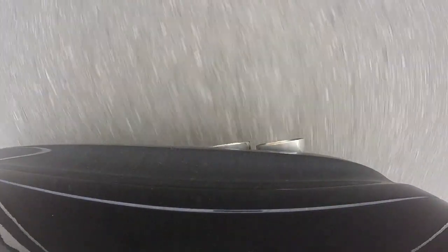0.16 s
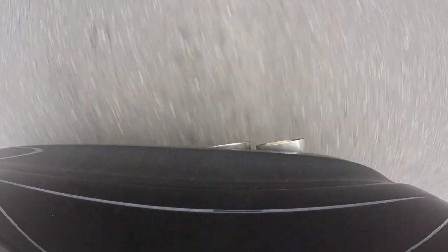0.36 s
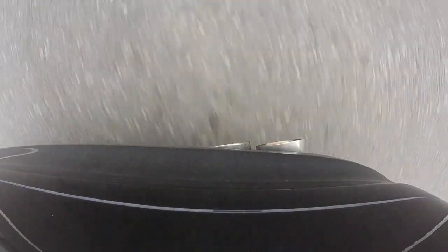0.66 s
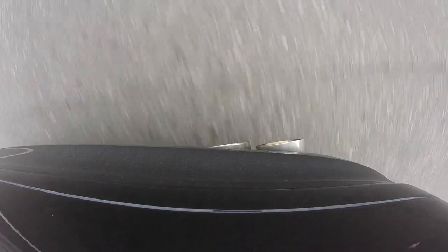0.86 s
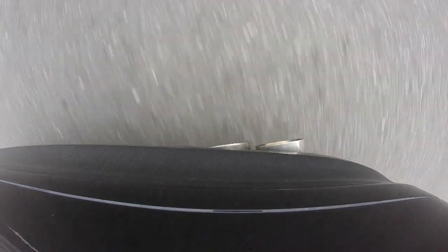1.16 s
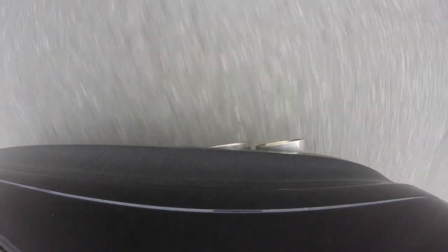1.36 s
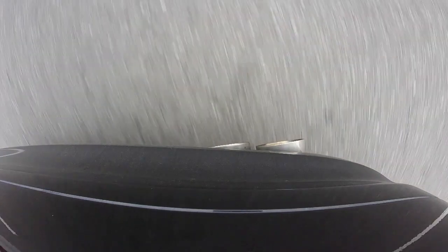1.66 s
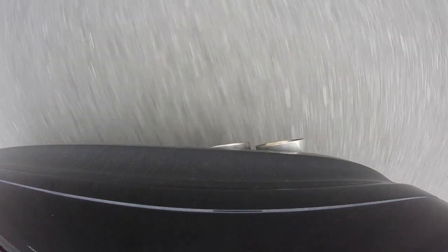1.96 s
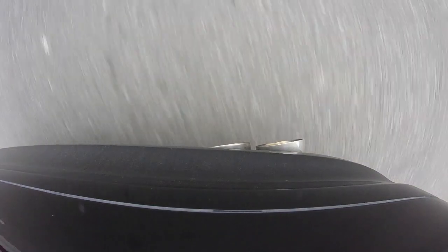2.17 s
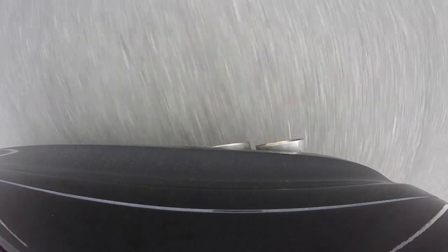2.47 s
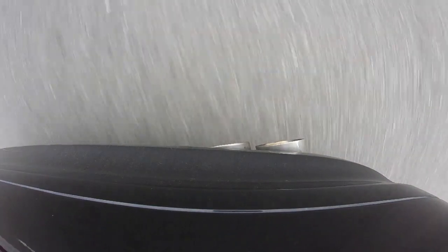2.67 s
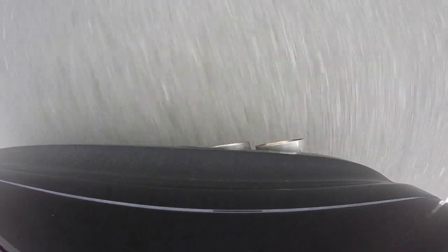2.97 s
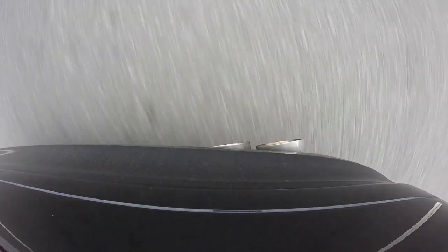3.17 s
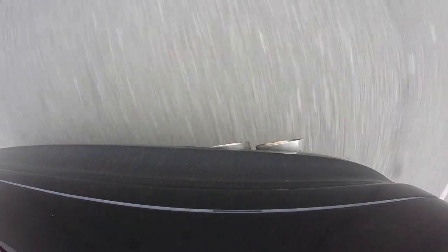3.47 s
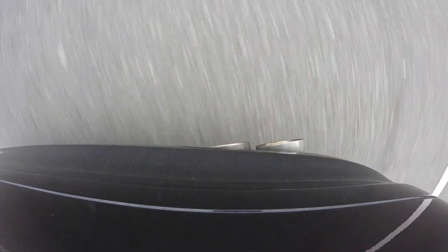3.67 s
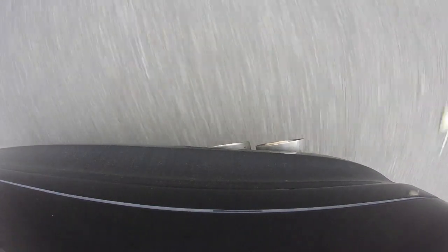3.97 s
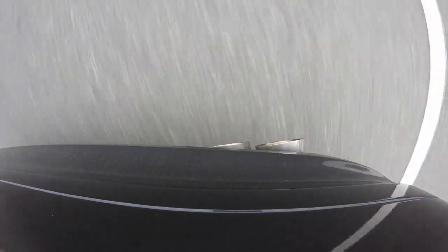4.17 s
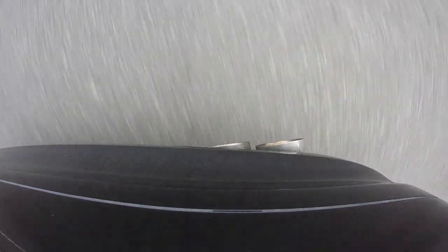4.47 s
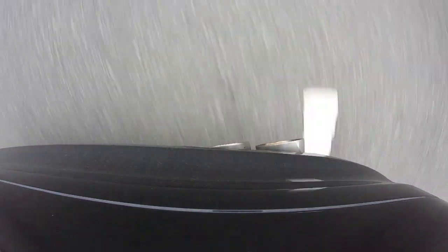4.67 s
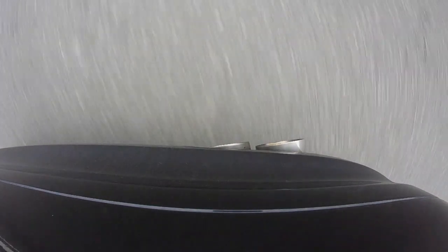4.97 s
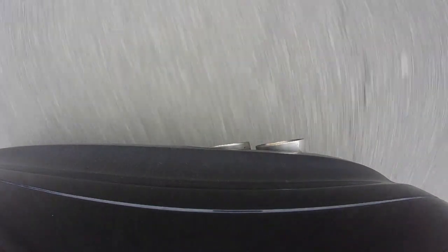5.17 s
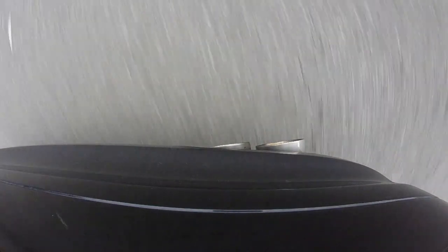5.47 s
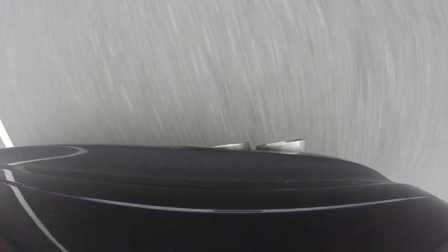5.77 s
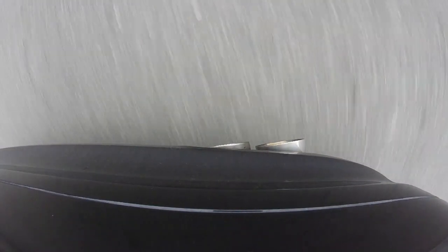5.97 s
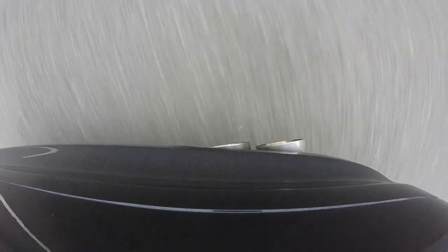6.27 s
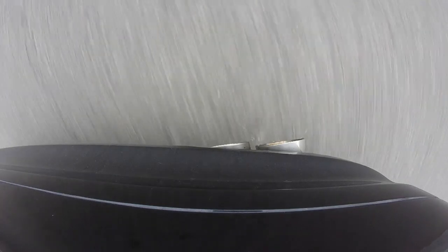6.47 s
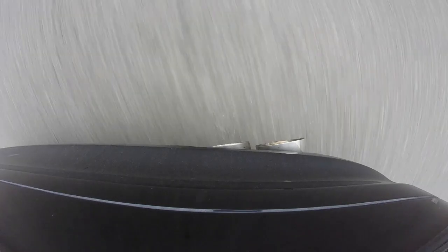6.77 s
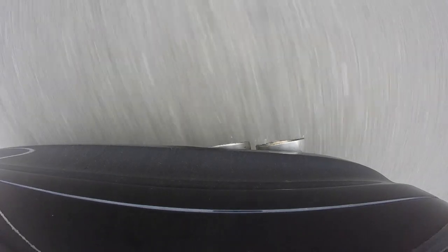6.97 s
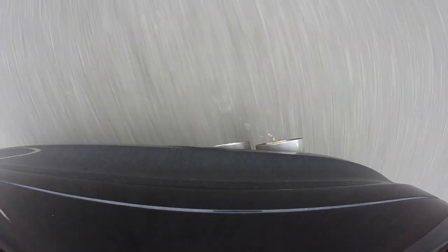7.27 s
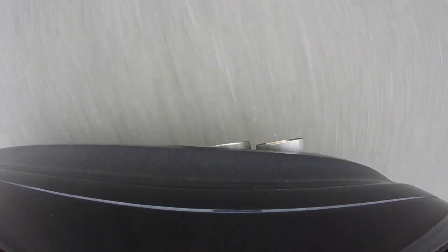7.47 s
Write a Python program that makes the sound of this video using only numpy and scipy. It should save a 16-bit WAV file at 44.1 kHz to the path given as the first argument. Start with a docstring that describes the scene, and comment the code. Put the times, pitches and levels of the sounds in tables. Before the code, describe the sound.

A six-cylinder car engine starts low and quiet, then pulls hard through one gear, its exhaust growl climbing in pitch and turning louder and raspier. Near the end a loose plastic clip rattles, the throttle lifts and the revs fall. Tyres drone on the road while wind and a shaking mount add a deep rumble. The sound is close and boxy, from a microphone in a closed case above the tailpipes.

```python
"""A six-cylinder car engine pulls hard through one gear, then eases off.
Two banks of three cylinders fire into ringing pipes, and gas rasps with each firing.
We listen from a camera in a closed case above the tailpipes. The tyres drone, wind and road
shake the springy mount about 35 times a second, and near the end a loose plastic clip rattles."""
import sys
import numpy as np
from scipy import signal
from scipy.fft import rfft, irfft
from scipy.io import wavfile
from scipy.ndimage import uniform_filter1d

SR = 44100
rng = np.random.default_rng(int(sys.argv[2]) if len(sys.argv) > 2 else 0)


def dump_mix(stems):
    """Bounce the given channels to the path in sys.argv[1] as a 16-bit WAV at rate SR."""
    frames = np.atleast_2d(stems).T  # one column per channel
    limited = np.clip(frames, -1, 1)  # hard clip at full scale
    pcm = np.round(limited * 32767).astype(np.int16)
    wavfile.write(sys.argv[1], SR, pcm)


N = 336042
TIME = np.arange(N) / SR
FREQ = np.arange(N // 2 + 1) * SR / N + 1e-3


def gain(db):
    """Turn decibels into a multiplier."""
    return 10 ** (np.asarray(db) / 20)


def unit(x):
    """Scale a signal to an average strength (rms) of 1."""
    return x / np.sqrt(np.mean(x ** 2))


def curves(table):
    """Join a table's points into one curve over time per column."""
    times, *columns = np.transpose(table)
    return [np.interp(TIME, times, column) for column in columns]


def resonances(hz, modes, steep=1):
    """How a ringing object answers each frequency; modes are (f/Hz, width/Hz, level/dB)."""
    return sum((-1) ** k * gain(db) * (1j * hz * width / (f * f - hz * hz + 1j * hz * width)) ** steep
               for k, (f, width, db) in enumerate(modes))


def colour(x, response):
    """Filter a signal, then scale it to strength 1."""
    return unit(irfft(rfft(x) * response, N))


def wander(rate):
    """A smooth random wobble that takes `rate` steps a second."""
    hold = int(SR / rate)
    steps = np.repeat(rng.standard_normal(N // hold + 1), hold)[:N]
    return unit(uniform_filter1d(uniform_filter1d(steps, hold), hold))


# The engine's tones; halves come from unequal banks: multiple of the firing rate, relative level/dB
TONES = [(.5, -3.5), (1, 3), (1.5, -0.5), (2, -2), (2.5, -7), (3, -12.5), (3.5, -12.5), (4, -13),
         (4.5, -20.5), (5, -26), (5.5, -25)]
# How the pipes boost a tone: f/Hz, level/dB with the banks in step, level/dB with them opposed
PIPE_BOOST = [(66.2, 5.5, -12), (85.46, 14.5, 4.5), (104.7, -13.5, -7.5), (129.8, 6.5, -2),
              (152.4, 3, -10.5), (178.5, 5.5, 2), (204.5, 3.5, 4), (220.3, 13.5, 11), (237.34, 9.5, 0.5),
              (254.6, 4.5, -10.5), (272.14, 13.5, -4.5), (287.1, -18, -4.5), (308.5, 0.5, -11),
              (340.7, -1, -0.5), (355.16, 14, 12), (375.8, 8, 1), (387.4, -12, -21.5), (425.6, -7.5, -20),
              (449.8, 0.5, -0.5), (491, -6.5, -4.5), (556.5, -5, -1.5), (584.6, 6, 8), (640.6, -8, -1.5),
              (642, -11.5, 6.5), (695.6, -4, 6.0), (781, -4.5, 7), (796.6, 5.5, 2), (860, -11.5, -0.5),
              (955, -17.5, -1), (1101.6, 0, -14), (1146, 5, -22.5), (1250.0, -14, -12), (1370.0, -6.5, 11)]
def engine_note(hz, fired, tone_db, rasp_db):
    """Regular firings make tones that swell and fade as they slide through the pipes' resonances."""
    pipe_hz, in_step_db, opposed_db = np.transpose(sorted(PIPE_BOOST))
    brighten_db = .08 * np.clip(rasp_db + 29, 0, None)  # rasp above -29 dB lifts the higher tones
    note = np.zeros(N)
    for multiple, db in TONES:
        boost_db = np.interp(np.log(multiple * hz), np.log(pipe_hz),
                             opposed_db if multiple % 1 else in_step_db)
        level_db = tone_db + db + boost_db + (multiple - 1) * brighten_db + .74 * wander(30)
        note += np.sqrt(2) * gain(level_db) * np.sin(2 * np.pi * multiple * fired)
    return note


# Each cylinder's strength, in firing order with the banks taking turns: level/dB
CYLINDER_LEVELS = [0, -6.5, -1.2, -5.8, -.6, -7.5]
# Extra travel time down each cylinder's own pipe: t/ms
CYLINDER_DELAYS = [0, .17, .025, .15, -.02, .2]
def firings(hz, fired):
    """Each firing gives a sharp pulse and a fading puff of gas; returns (pulses, gas)."""
    count = np.arange(int(fired[-1]) - 1)
    time_jitter, level_jitter = rng.standard_normal((len(count), 2)).T
    at = np.interp(count + .008 * time_jitter, fired, np.arange(N))
    at = np.clip(at + np.array(CYLINDER_DELAYS)[count % 6] * SR / 1000, 0, N - 2)
    size = gain(np.array(CYLINDER_LEVELS)[count % 6] + level_jitter)
    pulses = np.zeros(N)
    np.add.at(pulses, at.astype(int), size * (1 - at % 1))  # shared between two samples
    np.add.at(pulses, at.astype(int) + 1, size * (at % 1))
    latest = np.clip(fired.astype(int), 0, len(count) - 1)
    puffs = .25 + size[latest] * np.exp(-(fired % 1) / .35)
    return unit(pulses / np.sqrt(hz)), unit(puffs * rng.standard_normal(N))


# Where the pipes ring: f/Hz, width/Hz, level/dB
PIPE_RINGS = [(213.4, 17, 12), (354.9, 14.85, 16), (604.56, 24.23, 9.5), (701, 27, 4.5), (799.8, 70, 4),
              (1036, 32, -10.5), (1249, 120, -2.5)]
def pipe_growl(hz, fired, blows, growl_db):
    """Firings ring the pipes; slightly unequal cylinders add weak tones at sixths of the firing rate."""
    upper_rings = resonances(FREQ, PIPE_RINGS[2:]) / (1 + (FREQ / 1409) ** 4)
    growl = colour(blows, upper_rings) * gain(growl_db - 6)
    for multiple in [n / 6 for n in range(4, 30) if n % 3]:
        boost = np.abs(resonances(multiple * hz[::64], PIPE_RINGS))
        boost *= gain(2.6 * wander(1500)[:N // 64 + 1])
        tone = np.sin(2 * np.pi * (multiple * fired + rng.random()))
        growl += gain(.6963 * growl_db - 28.5) * boost.repeat(64)[:N] * tone
    return growl


# What the closed case lets through: f/Hz, width/Hz, level/dB
CASE_BANDS = [(1017, 57, -17.5), (1301.4, 235, 3), (1551.7, 139.2, 4), (2052, 110, -14.5), (2610, 390, -9),
              (3166, 92, -12), (3460, 275, -5), (4165, 300, -13), (4588, 420, -26.5), (5238, 360, -32),
              (6357, 750, -36), (7300, 140, -51.5), (8200, 730, -41.5), (9700, 620, -55), (11870, 500, -51)]
def gas_rasp(hz, pulses, gas, sharpness, rasp_db, gas_db):
    """Pulses and rushing gas come through the case as a low rasp, a hiss and a high sizzle."""
    case = resonances(FREQ, CASE_BANDS, steep=2)
    treble = (FREQ / 1461) ** 8  # splits rasp from hiss at 1461 Hz
    blows = (sharpness * pulses + np.sqrt(1 - sharpness ** 2) * gas) * gain(rasp_db + 17.09)
    rasp = irfft(rfft(blows) * case / (1 + treble), N)
    hiss = colour(.93 * sharpness * pulses + gas, case * treble / (1 + treble)) * gain(gas_db + 2.24)
    # the sizzle opens up only when the engine works hard and fast
    sizzle_db = -58.5 + 1.37 * (gas_db + 40.5) + 20.5 * np.log2(hz / 200)
    sizzle = colour(gas, case / (1 + (5380 / FREQ) ** 8)) * gain(np.maximum(sizzle_db, -80.5))
    return rasp + hiss + sizzle


# How often the engine fires: t/s, f/Hz
FIRING_RATE = [(0.0, 91.2), (0.2, 81.8), (0.6, 84.3), (0.8, 89.1), (1.2, 95.7), (1.4, 100.5), (2.2, 121.5),
               (2.8, 136.0), (3.2, 144.8), (3.6, 151.9), (4.0, 158.2), (4.6, 165.9), (5.2, 180.8),
               (5.4, 188.3), (5.6, 197.0), (6.2, 219.7), (6.4, 229.3), (6.9, 250.2), (6.98, 251.5),
               (7.14, 247.1), (7.22, 243.1), (7.3, 232.2), (7.54, 205.1), (7.62, 196.0)]
# How hard it works, before each layer's own boost: t/s, tone level/dB, rasp level/dB, gas level/dB
EFFORT = [(0.0, -43, -61, -67.5), (0.25, -37.5, -60, -57.0), (0.5, -59, -55.5, -57.5),
          (0.62, -44.5, -65, -68), (0.95, -35.5, -49, -59.5), (1.25, -26, -42, -52.5),
          (1.75, -25, -40, -49.0), (2.2, -27, -38.5, -47.5), (2.65, -24, -34, -44.0),
          (2.95, -27, -36, -50.5), (3.3, -26.0, -36, -47.5), (3.9, -31.5, -37.5, -50.5),
          (4.75, -28, -34.5, -49.5), (4.95, -29, -28.5, -40.5), (5.48, -23, -28.0, -38.5),
          (5.56, -21.5, -24.5, -37), (6.03, -22, -25.0, -35.5), (6.2, -29, -31.5, -40.0),
          (6.6, -30, -28.0, -38), (7.05, -23, -25.5, -37.0), (7.14, -29, -32, -61), (7.19, -45, -37, -61),
          (7.28, -40.5, -35.0, -54.5), (7.62, -39.5, -35.5, -51.5)]
def exhaust():
    """The engine's speed and effort drive its note, growl and rasp together."""
    hz, = curves(FIRING_RATE)
    tone_db, rasp_db, gas_db = curves(EFFORT)
    fired = np.cumsum(hz) / SR  # firings so far
    note = engine_note(hz, fired, tone_db, rasp_db)
    pulses, gas = firings(hz, fired)
    sharpness = np.clip((rasp_db + 40) / 15, .65, .97)  # with effort, pulses take over from gas noise
    growl_db = rasp_db + .403 * (tone_db - rasp_db) - 4
    growl = pipe_growl(hz, fired, sharpness * pulses + .6 * gas, growl_db)
    return note + growl + gas_rasp(hz, pulses, gas, sharpness, rasp_db, gas_db)


# The drone from bass to treble: f/Hz, relative level/dB
DRONE_SHAPE = [(60, -6), (100, -5.5), (210, -5), (370, -17.5), (430, -25), (1000, -23), (3000, -32),
               (4200, -39.5), (6000, -50), (10000, -54), (12000, -64), (14500, -68)]
# Where it rings: f/Hz, width/Hz, level/dB
DRONE_RINGS = [(222, 13.83, 12), (339.6, 31, 11), (1320, 210, 9.5), (1510, 194.3, 10.5), (2627, 180, 9.5),
               (3320, 220, 8.5), (6410, 190, 6.5)]
# How loud it is: t/s, level/dB
DRONE_LEVEL = [(0, -37), (1.5, -36.5), (3, -31.5), (5, -31), (7, -27), (7.62, -30.5)]
def tyre_drone():
    """Rolling tyres and the car's body drone, ringing in the pipes and the case."""
    hz, db = np.transpose(DRONE_SHAPE)
    shape = gain(np.interp(np.log(FREQ), np.log(hz), db, left=-60))
    rings = 1 + np.abs(resonances(FREQ, DRONE_RINGS))
    return colour(rng.standard_normal(N), shape * rings) * gain(curves(DRONE_LEVEL)[0] + .5 * wander(12))


# Swells of swaying: t/s at the top, relative level/dB, f/Hz, half width/s
SWAY_SWELLS = [(0.049, -24, 28.47, 0.164), (.3, -17.5, 31.7, 0.066), (0.511, -28.5, 31.56, 0.0455),
               (0.699, -20, 34.62, 0.029), (0.848, -34, 34.75, 0.036), (1.049, -22, 32.12, 0.0575),
               (1.401, -18, 33.58, 0.118), (1.88, -17, 33.03, 0.231), (2.45, -16, 31.7, 0.2092),
               (2.8, -22, 31.15, 0.1535), (3.08, -23, 30.5, 0.0201), (3.25, -10, 35.25, 0.0566),
               (3.42, -13.5, 36.7, 0.027), (3.56, -11.5, 38, 0.095), (3.83, -10, 34.68, 0.0417),
               (3.969, -11.5, 33.48, 0.046), (4.112, -10.5, 34.6, 0.0405), (4.29, -15, 37.24, 0.0541),
               (4.521, -17, 35.96, 0.087), (4.95, -22, 31.68, 0.0573), (5.16, -14.5, 33.7, 0.106),
               (5.412, -11, 32.93, 0.053), (5.628, -16, 32.7, 0.0556), (5.81, -20, 34.3, 0.0541),
               (6.11, -12, 30.99, 0.0884), (6.52, -18, 33.23, 0.13), (6.74, -15.5, 37.25, 0.0842),
               (7.05, -9.5, 32.9, 0.1092), (7.301, -11, 33.43, 0.084), (7.56, -13.5, 32.27, 0.191)]
def mount_sway():
    """The camera swings and shakes on its springy mount, making a deep throb."""
    times, _, rates, _ = np.transpose(SWAY_SWELLS)
    hz = np.interp(TIME, times, rates) * (1 + .0716 * wander(15))
    swells = sum(gain(db) * np.exp(-((TIME - top) / width) ** 2) for top, db, _, width in SWAY_SWELLS)
    swing = np.sqrt(2) * np.sin(2 * np.pi * np.cumsum(hz) / SR)
    shake = colour(rng.standard_normal(N), resonances(FREQ, [(34.4, 17, 0)], steep=1.827))
    return (gain(-25) + swells) * (.762 * swing + .56 * shake)


# The wind's strength: t/s, level/dB
GUSTS = [(0.0, -25.5), (0.23, -32.5), (0.42, -42.5), (0.47, -28.5), (0.76, -35.5), (0.85, -19.5),
         (0.93, -38.5), (1.04, -24), (1.23, -34), (2.52, -19), (3.29, -27.5), (3.37, -21), (3.42, -41),
         (3.46, -26), (4.61, -23), (4.73, -14), (4.84, -27.5), (5.28, -19.5), (5.54, -30), (6.05, -18.5),
         (6.07, -14), (6.26, -30.5), (6.73, -20), (6.79, -37), (6.83, -17.5), (7.28, -31), (7.56, -19.5),
         (7.62, -43)]
def wind():
    """Gusts beat on the camera, rumbling a little higher than the sway."""
    rumble = colour(rng.standard_normal(N), resonances(FREQ, [(58.8, 22.2, 0)], steep=2.275))
    rumble /= np.sqrt(.13 + uniform_filter1d(rumble ** 2, size=3500))  # evened out, so the gusts lead
    return gain(curves(GUSTS)[0] + 2 * wander(14)) * rumble


# Each knock of the loose plastic: t/s, relative level/dB
KNOCKS = [(6.0682, -28), (6.0768, -20.5), (6.0895, -34.5), (6.105, -20), (6.1148, -26), (6.142, -27.5),
          (6.1757, -26.5), (6.1838, -32.5), (6.2059, -27.5), (6.2128, -34.5), (6.2438, -31), (6.251, -24),
          (6.277, -24.5), (6.3077, -28.5), (6.3364, -34), (6.363, -25), (6.375, -30), (6.3944, -33.5),
          (6.491, -28.5), (7.1138, -31.5), (7.259, -28.5), (7.2693, -24), (7.2889, -27), (7.2963, -34.5),
          (7.3226, -31.5), (7.3514, -37), (7.3583, -32), (7.3814, -28), (7.414, -35.5)]
# Where the plastic rings: f/Hz, width/Hz, level/dB
PLASTIC_RINGS = [(2575, 1680, 16), (5170, 2300, 9.5), (8499, 2870, 0), (11700, 3000, -19.5)]
def plastic_rattle(rise_s=.003):
    """The loose plastic clip chatters in short scratchy bursts."""
    bursts = np.zeros(N)
    for start, db in KNOCKS:
        age = np.clip(TIME - start, 0, None) / rise_s
        bursts += gain(db) * age * np.exp((1 - age ** 2) / 2)
    ring = resonances(FREQ, PLASTIC_RINGS, steep=2)
    ring /= np.sqrt(np.mean(np.abs(ring) ** 2))
    grit = unit(rng.standard_normal(N) * gain(1.5 * wander(1500)))
    return gain(-7.5) * irfft(rfft(grit * bursts) * ring, N)


def scene():
    """Everything reaches one microphone."""
    return (exhaust() + tyre_drone() + mount_sway() + wind() + plastic_rattle())[None]


def record(dry):
    """The camera rounds off the loudest peaks and cuts the treble above 15200 Hz."""
    rounded = np.tanh(.95 * dry) / .95
    return signal.sosfilt(signal.ellip(8, .2, 70, 15200, fs=SR, output="sos"), rounded)


dry = scene()
out = record(dry)
dump_mix(out)
```